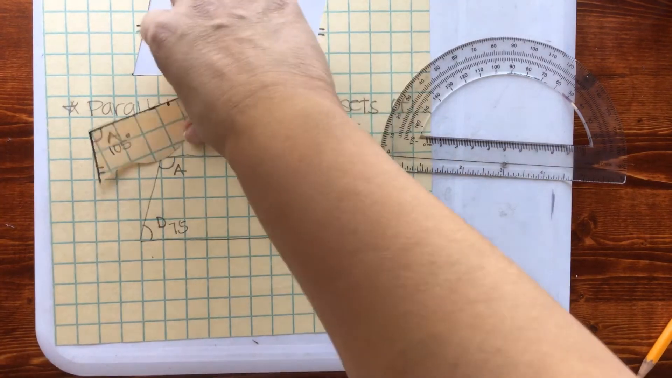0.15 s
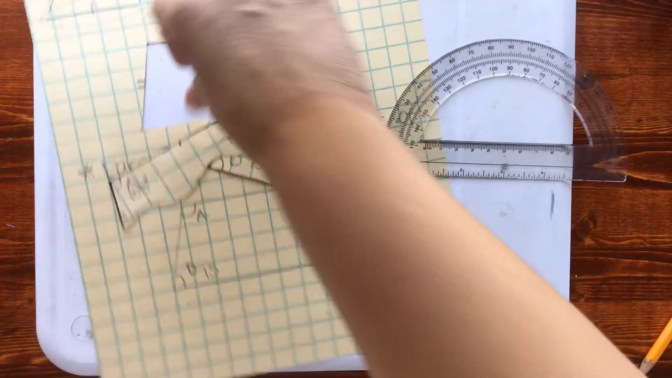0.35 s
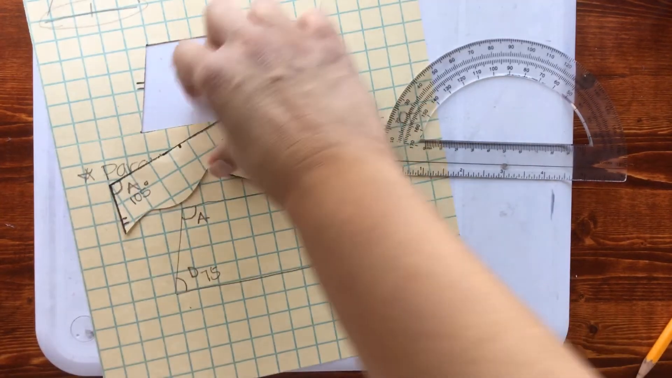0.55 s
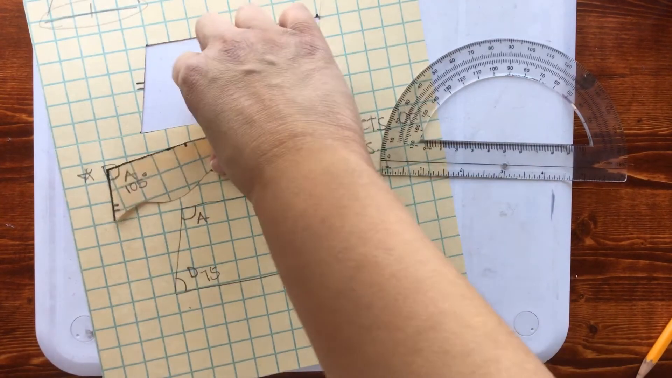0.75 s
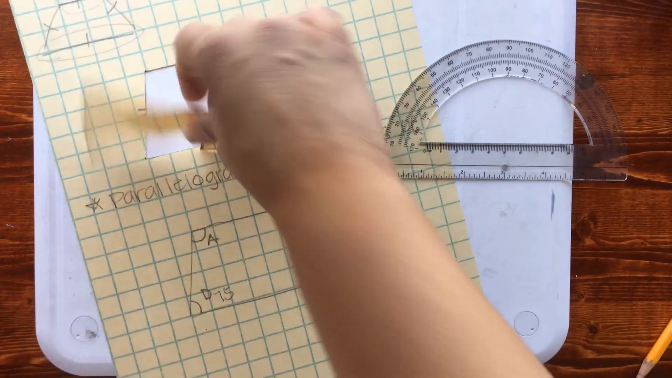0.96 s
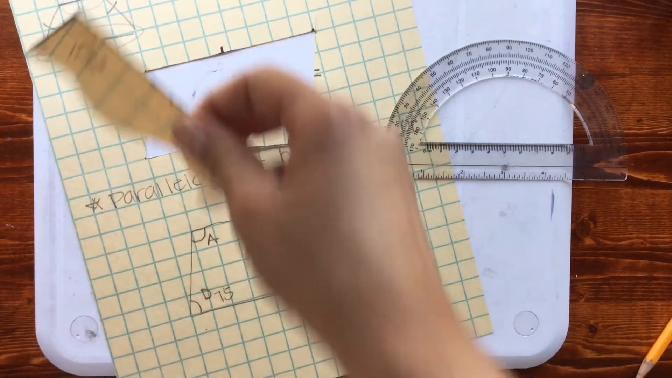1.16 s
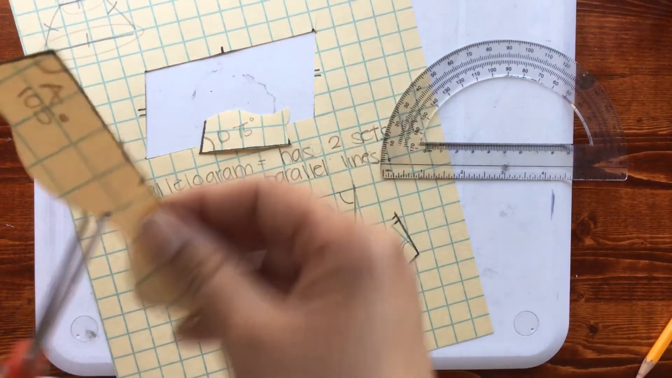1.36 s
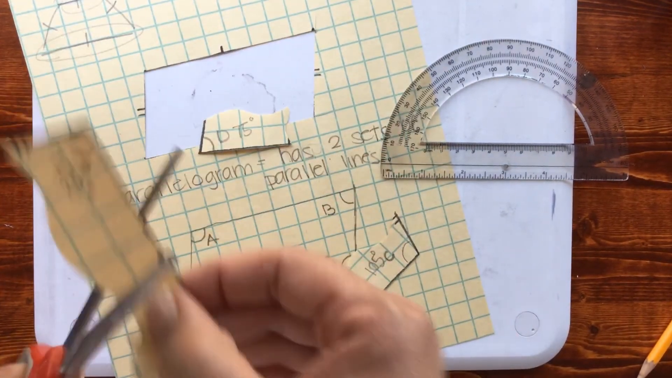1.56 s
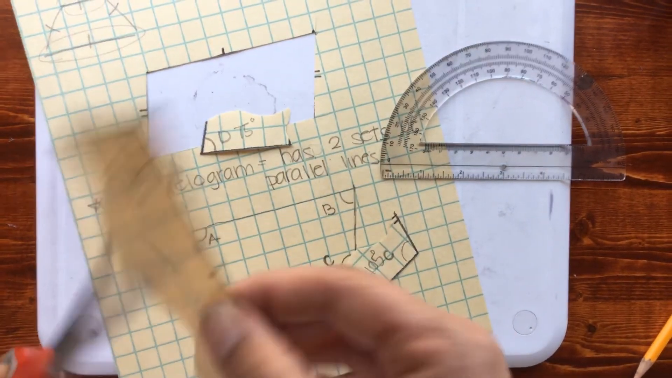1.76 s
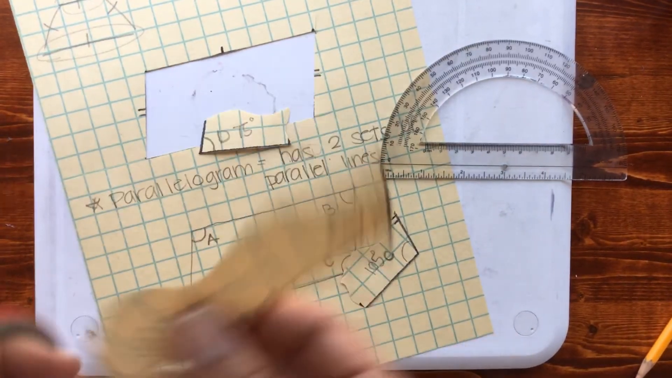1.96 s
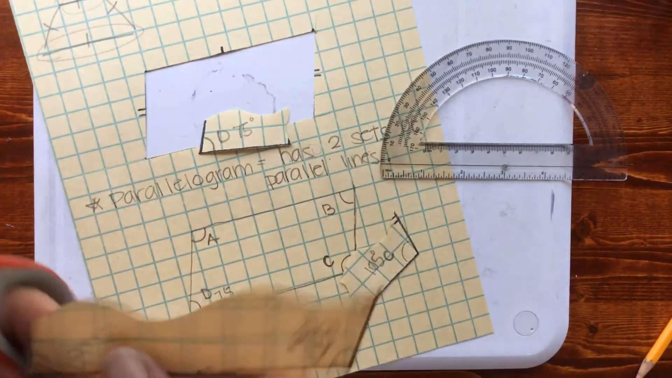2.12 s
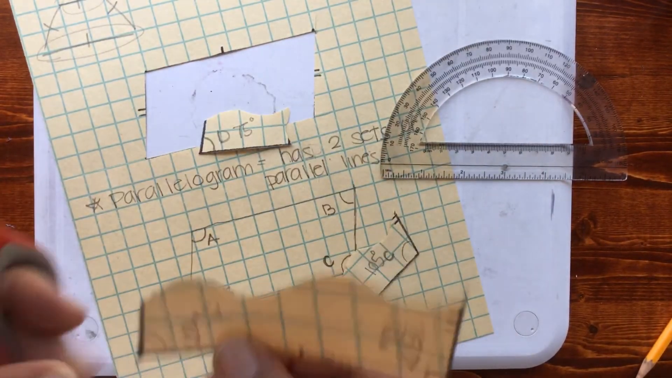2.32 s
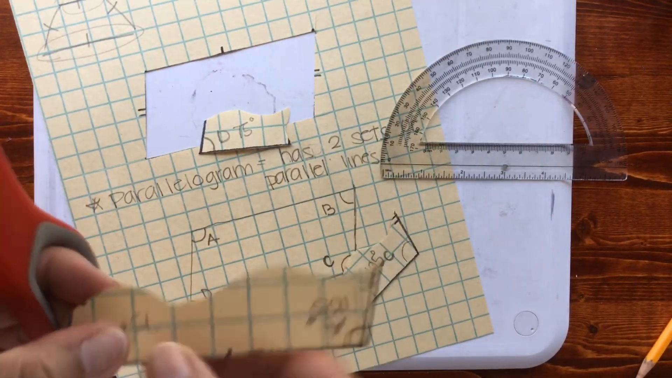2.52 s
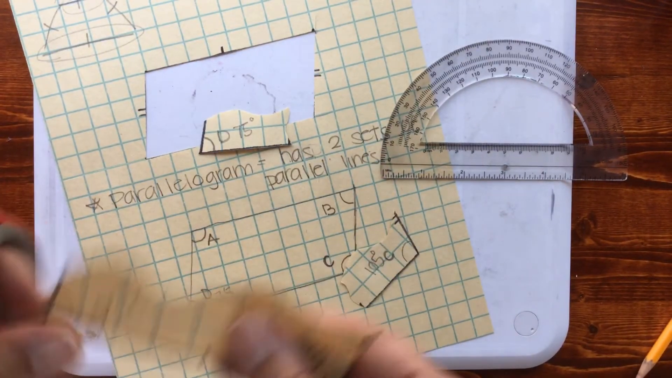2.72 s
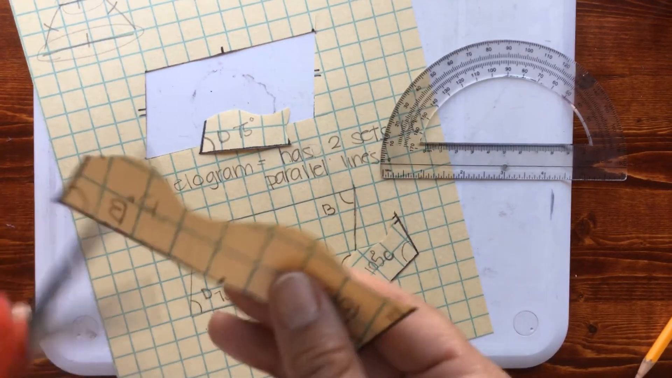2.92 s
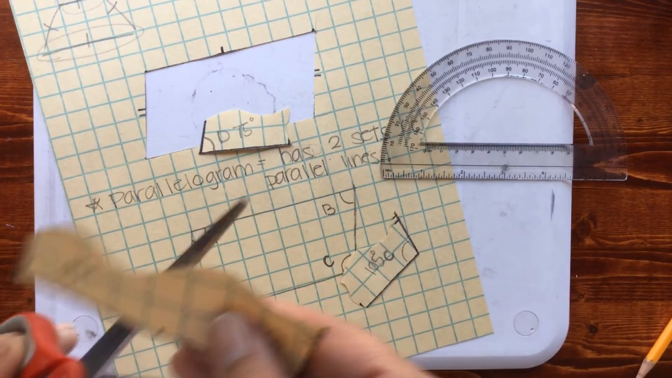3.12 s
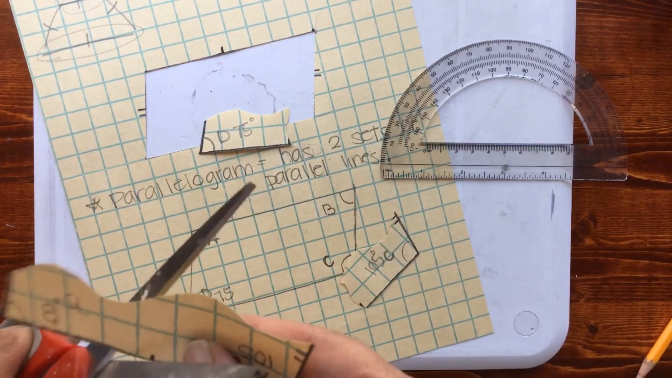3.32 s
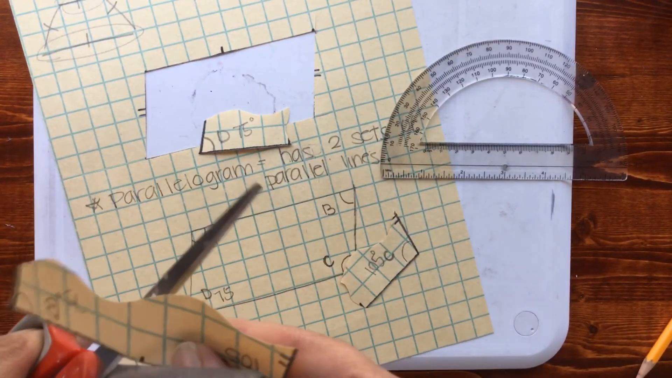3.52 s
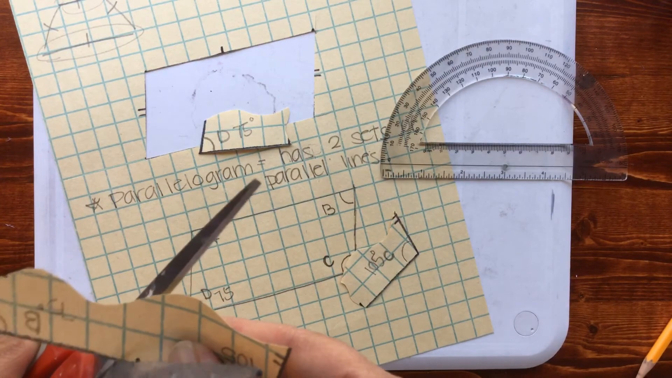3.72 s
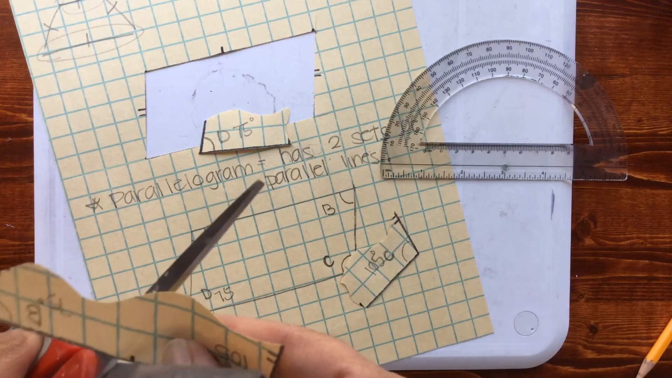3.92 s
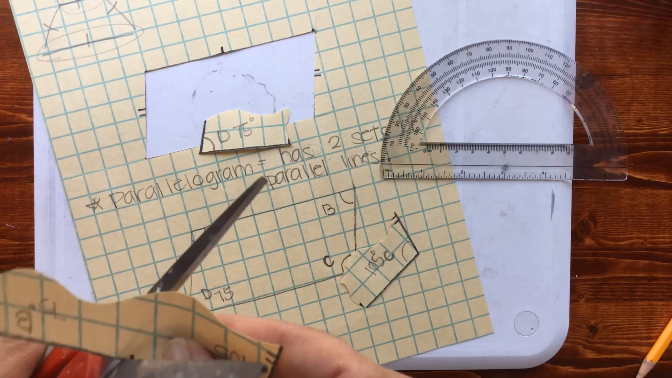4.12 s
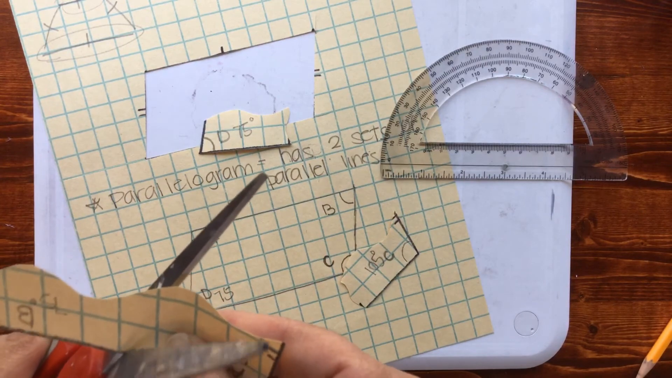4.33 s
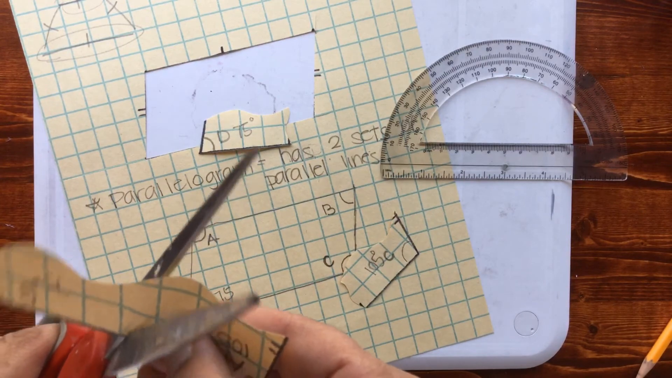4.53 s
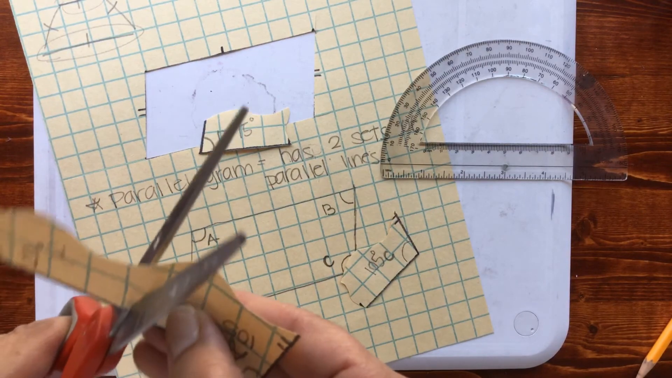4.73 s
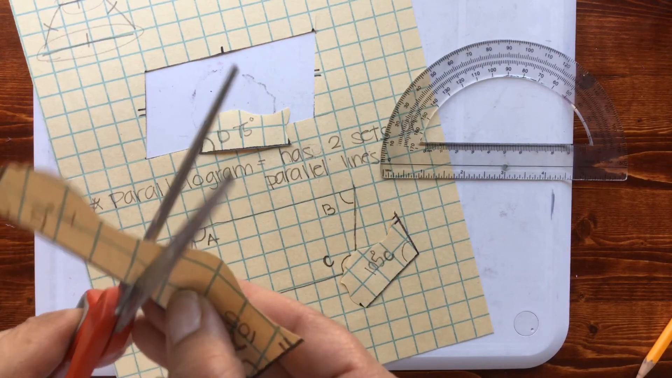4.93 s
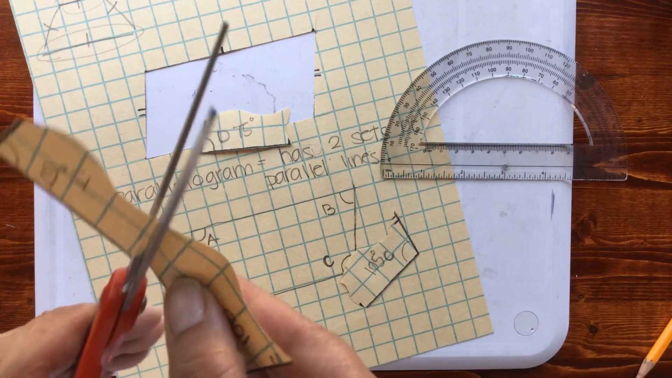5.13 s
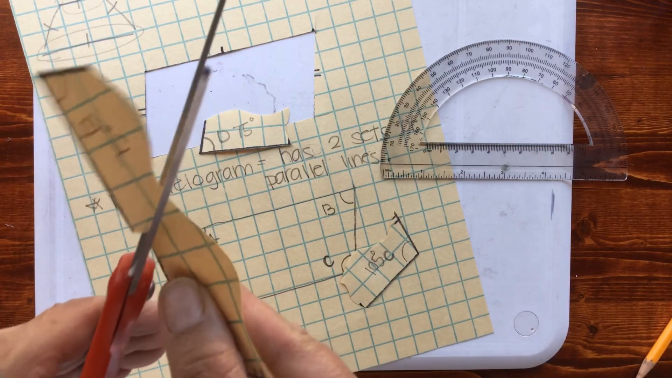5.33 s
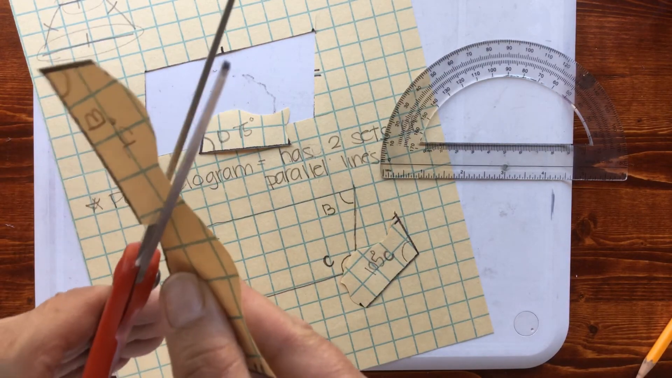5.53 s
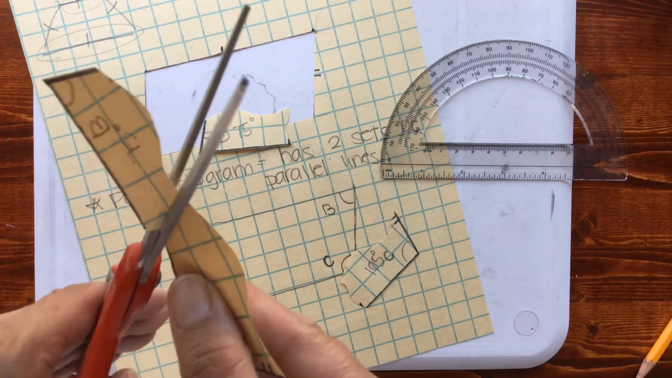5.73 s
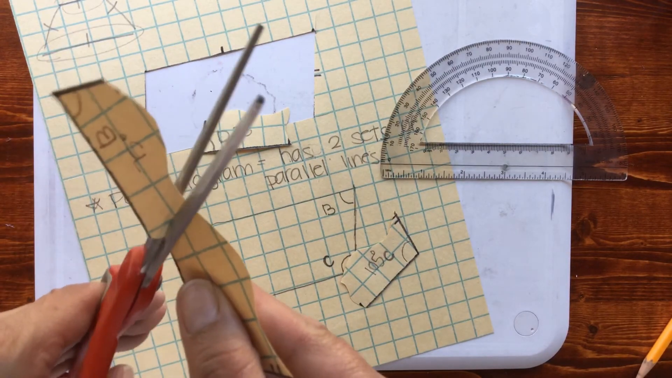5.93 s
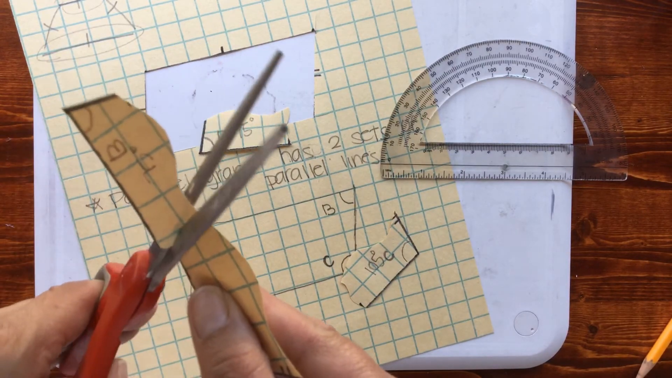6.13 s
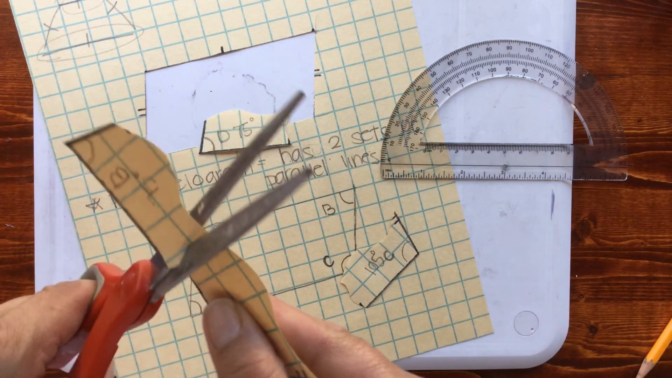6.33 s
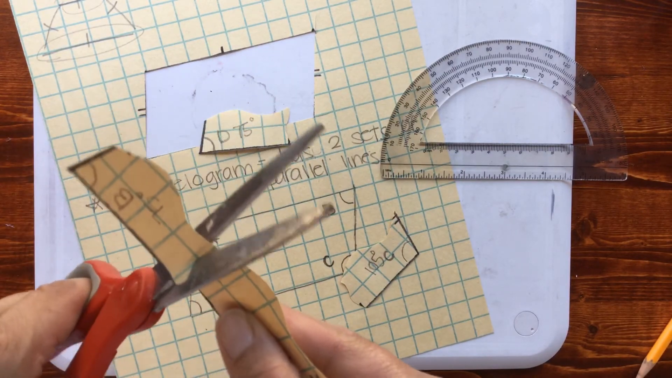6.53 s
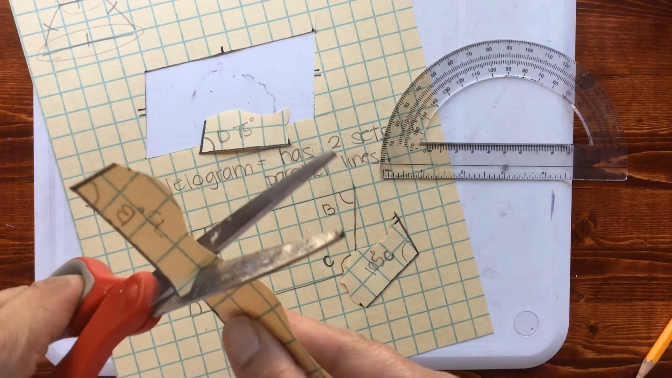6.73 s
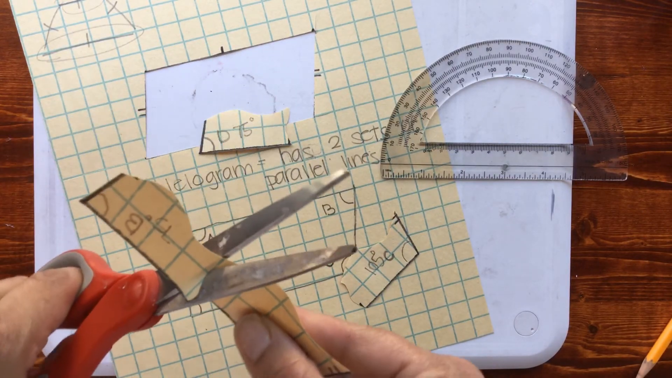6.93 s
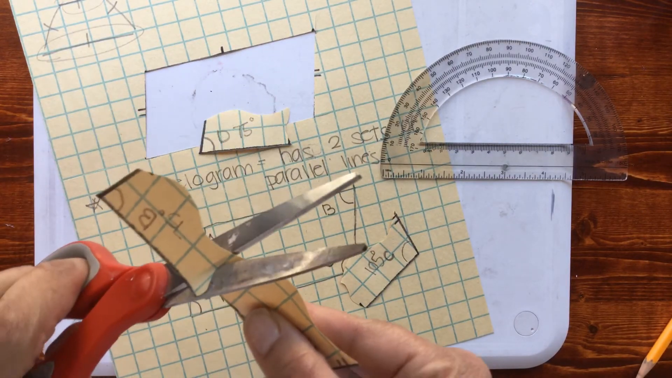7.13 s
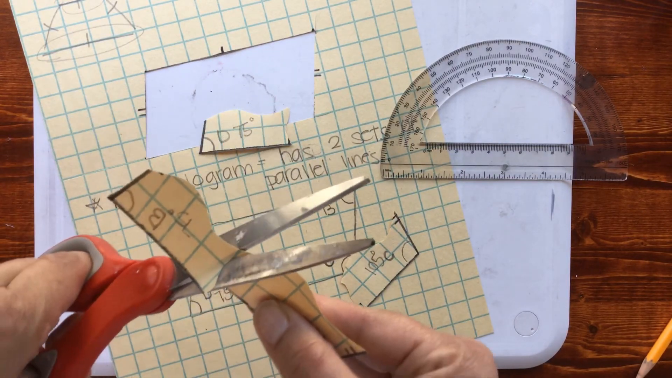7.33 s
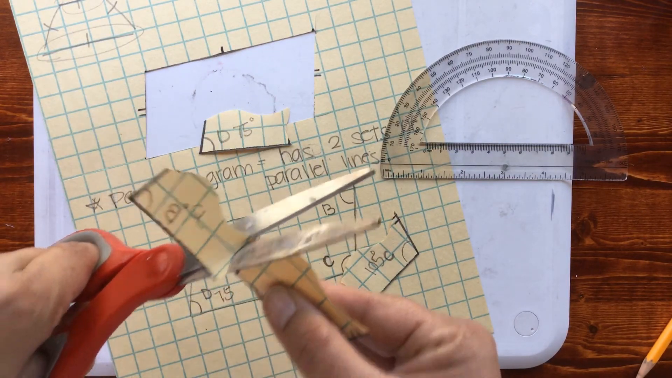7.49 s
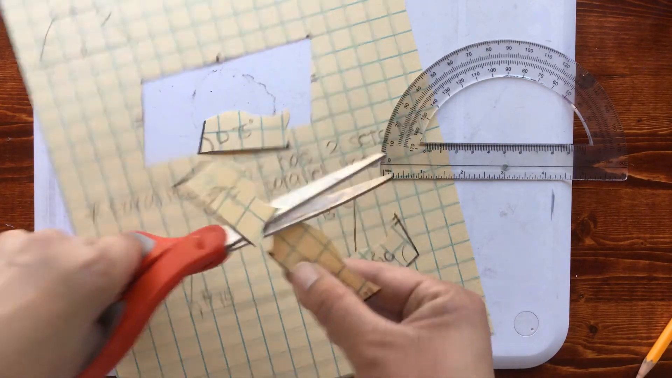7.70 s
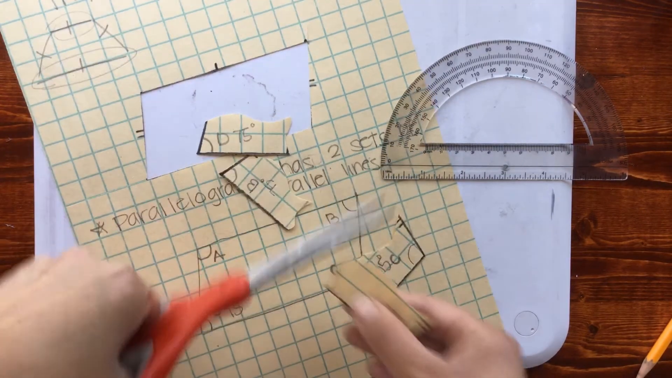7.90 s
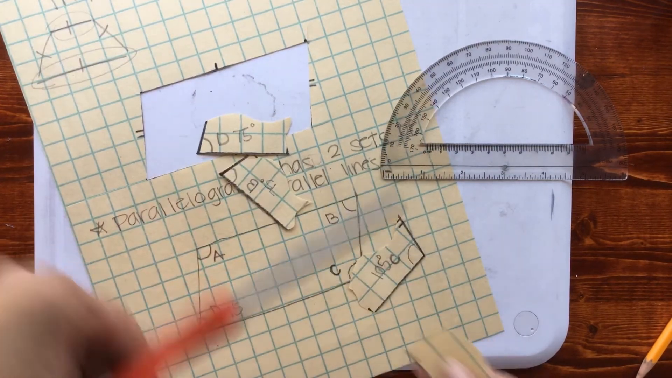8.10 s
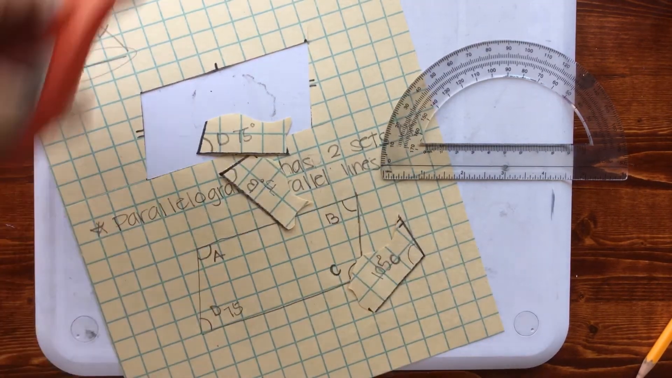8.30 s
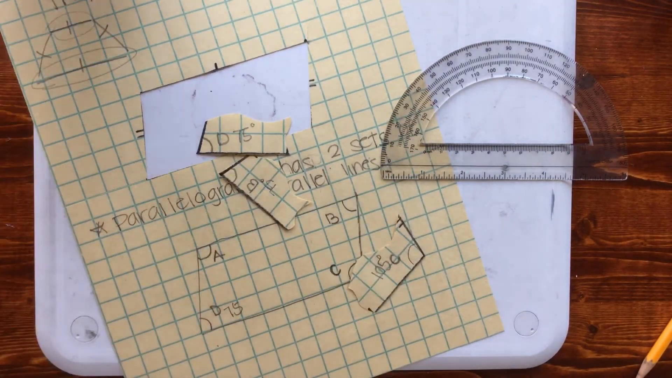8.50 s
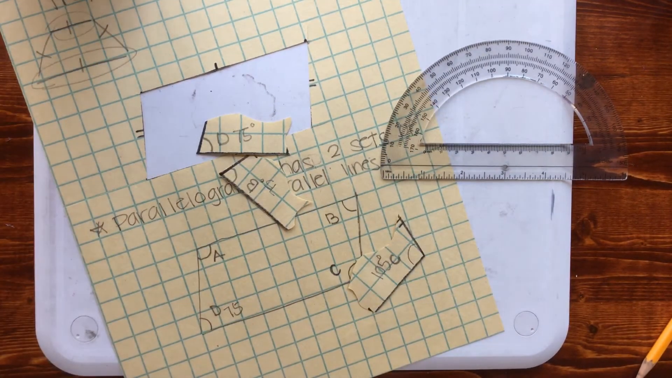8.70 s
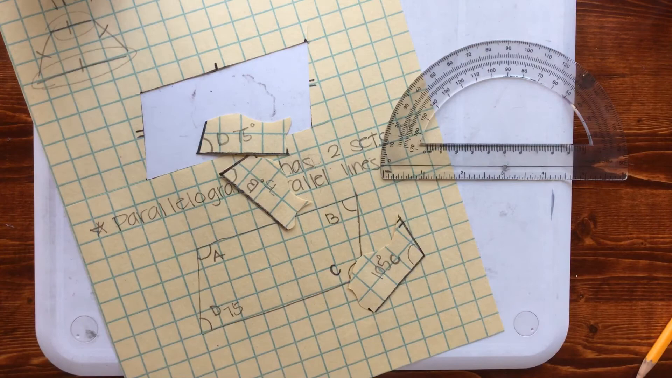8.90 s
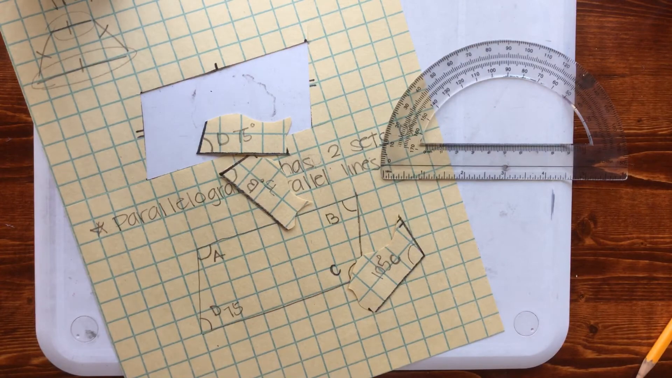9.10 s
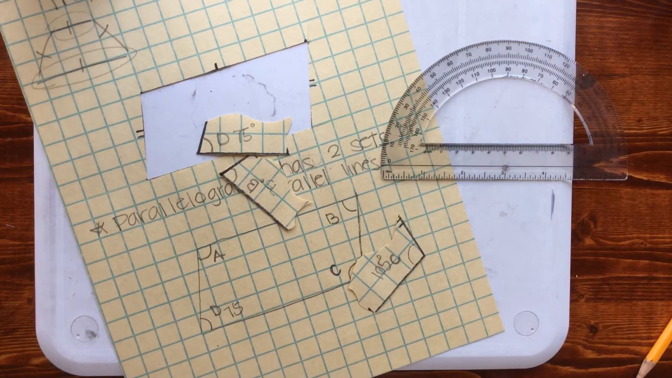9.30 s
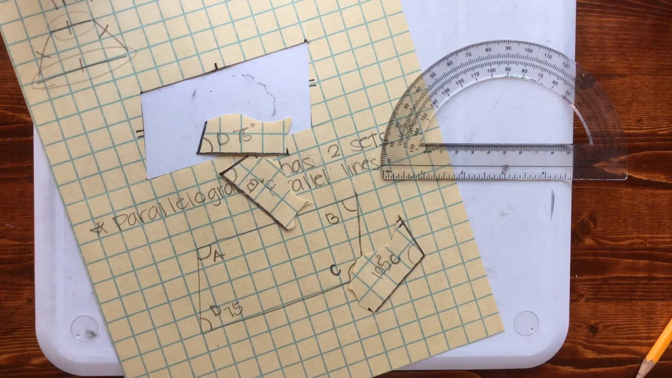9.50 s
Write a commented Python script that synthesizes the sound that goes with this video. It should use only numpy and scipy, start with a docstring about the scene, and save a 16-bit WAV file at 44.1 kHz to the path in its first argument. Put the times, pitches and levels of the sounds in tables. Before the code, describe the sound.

Dry paper rustles, brief drags and soft hollow knocks come first, with sudden crunches as a strip is flexed. A quieter pause leads to one slow scissor cut, densest at its start, then sparse ticking fibres until the blades snap shut. Loose metal ticks and a soft tap follow; after near silence, the scissors drop onto wood. Close, dry indoor sound with faint room air and low hum.

```python
"""Fingers are heard first, tapping and sliding over a sheet on a board; a paper strip rustles and crinkles.
Scissors then close slowly through the strip, a random train of parting fibres and louder snaps, and clack shut.
The pivot ticks, a few soft rubs and knocks follow, and the scissors clatter down on the wooden desk.
Friction is filtered random impulses; impacts are decaying noise and damped modes; a faint room answers."""
import sys
import numpy as np
from scipy import signal
from scipy.fft import rfft, irfft, next_fast_len
from scipy.io import wavfile
from scipy.ndimage import map_coordinates

SR = 44100
rng = np.random.default_rng(int(sys.argv[2]) if len(sys.argv) > 2 else 0)


def wrap_up_sound(samples):
    """Save the sound to the file named by the first command line argument, as 16-bit audio."""
    columns = np.atleast_2d(samples).T
    # keep every value between -1 and 1, then stretch to whole-number steps
    tamed = np.clip(columns, -1, 1)
    steps = np.round(tamed * 32767).astype(np.int16)
    wavfile.write(sys.argv[1], SR, steps)


N = 421155  # length of the scene [samples]
RING_SIZE = 16384  # length of one contact's answer [samples]
AGE = np.arange(RING_SIZE) / SR  # time since a contact [s]


# the closing blades: (time [s], relative fibre crackle level [dB], relative blade rasp level [dB])
CUT = [(4.3, -74, -83), (4.46, -75.5, -90), (4.53, -59.5, -67), (4.66, -67, -93), (4.83, -67.5, -85),
       (4.91, -53, -56), (4.99, -70, -90), (5.14, -56.5, -58.5), (5.23, -67, -67.5), (5.38, -58, -57),
       (5.53, -68, -67.5), (5.73, -60, -69.5), (6.03, -62, -68.5), (6.17, -69, -81), (6.43, -67, -84),
       (6.57, -83.5, -86), (6.85, -76, -82), (7.24, -70, -74), (7.35, -59.5, -69), (7.5, -67.5, -82.5),
       (7.745, -57, -63)]
# thick bundles of fibres snap: (time [s], relative snap level [dB], relative level of the strip's ring [dB])
SNAPS = [(4.5961, -38.5, -75), (4.7565, -41, -61), (4.7827, -38.5, -58), (4.857, -43.5, -70),
         (4.8715, -33.5, -64), (4.9053, -37, -60), (4.926, -35.5, -50), (4.9656, -36, -72),
         (5.012, -26.5, -48), (5.019, -29.5, -53), (5.1019, -33, -50), (5.143, -28, -61),
         (5.1608, -40.5, -59), (5.169, -30, -45), (5.1877, -38, -55), (5.2651, -35, -52), (5.275, -42, -63),
         (5.3637, -41, -57), (5.4847, -42, -55), (5.576, -35.5, -59), (5.609, -31.5, -68),
         (5.677, -44.5, -72), (5.694, -37, -66), (5.8629, -38, -61), (5.915, -36.5, -52),
         (6.0332, -40, -63), (6.106, -38, -64), (6.127, -39, -62), (6.2528, -44, -69), (6.3796, -42.5, -67),
         (6.4316, -47, -73), (6.4805, -47.5, -76), (6.697, -47, -63), (7.22, -49, -71), (7.3344, -43, -63),
         (7.3742, -40, -63), (7.43, -42.5, -60), (7.7023, -48, -59)]
# ticking of parted fibres: (frequency [Hz], level per Hz [dB])
FIBRE = [(600, -45), (1400, -22), (2700, -9), (3900, -21), (4900, -19), (5900, -10), (7600, -13),
         (8800, -1), (9700, 0), (10700, -8), (12000, -4), (15800, -8)]
# modes of the open blades, damped by the paper: (frequency [Hz], relative level [dB], t60 [s])
EDGES = [(2650, -2, 0.013), (3360, -4, 0.021), (4440, -9, 0.028), (5170, -4.5, 0.02), (6030, -2, 0.017),
         (6900, -3.5, 0.02)]
EDGES_DB = -14  # blade ring relative to the crackle [dB]
FIBRES_PER_S, CRACKLE_REF_DB = 250, -62  # impulse rate [1/s] at this crackle level [dB]
DENSITY_GROWS = 0.8  # growth of the rate with level [dB per dB]


def cutting():
    """Fracture noise: random fibre impulses and louder snaps excite the blades and the strip's resonance."""
    crackle_db, rasp_db = curves(CUT)
    bite = unit(amp(2.8 * wobble(45)))  # the blades advance in small jerks
    density = np.clip(amp(DENSITY_GROWS * (crackle_db - CRACKLE_REF_DB)), 0.2, 2)
    fibre_kicks = kicks(rate=FIBRES_PER_S * density, spread_db=2.5)
    fibres = bite * unit(fibre_kicks / np.sqrt(density))  # level kept independent of density
    treble = amp(crackle_db + 0.35) * fibres
    body = amp(rasp_db - 3) * fibres
    for s, snap_db, ring_db in SNAPS:
        add(treble, s, [amp(snap_db + 9.5)])
        add(body, s, [amp(ring_db + 15)])
    ticks = flexing(treble, FIBRE, hold_s=0.16, crack_t60=0.0045)
    shiver = flexing(body, [(300, -20), (1000, 0)], hold_s=0.13, crack_t60=0.009)
    edges = ring(EDGES, scatter_db=0)
    steel = signal.fftconvolve(treble, edges / np.linalg.norm(edges))[:N]
    return ticks + amp(EDGES_DB) * steel + reshape(shiver, strip_resonance)


# resonance of the strip as blades and fingers grip it anew: (time [s], frequency [Hz])
GRIP = [(4.3, 2780), (5.12, 2680), (5.2, 1440), (5.48, 1360), (5.65, 2320), (6.0, 2670), (6.4, 3270),
        (6.7, 2820), (7.0, 2750), (7.1, 1870), (7.45, 1860), (7.75, 2200)]


def strip_resonance(hz, s, upper=1.8, upper_db=-11):
    """Resonance of a gripped strip: a low mode and a weaker upper one, both moving with the grip."""
    centre = np.interp(s, *np.transpose(GRIP))

    def mode(f, width):
        return 1 / (1 + (np.log((hz + 1) / f) / width) ** 2)

    gain = mode(centre, 0.18) + amp(upper_db) * mode(upper * centre, 0.05)
    return gain / np.sqrt(np.mean(gain ** 2, axis=0))


# impact noise of the blades at their stop: (frequency [Hz], level per Hz [dB])
STEEL = [(150, -18), (350, -7), (1100, -22), (2000, -7), (3000, -17), (4700, -22), (5400, -4), (6200, -12),
         (6800, -6), (7800, -13), (9200, 3), (10500, -8), (12000, -6), (15500, -7)]
# modes of the shut blades: (frequency [Hz], level before random scatter [dB], t60 [s])
BLADES = [(2010, -35.5, 0.038), (4000, -53.5, 0.11), (5450, -30.5, 0.024), (6890, -31.5, 0.04),
          (9140, -15, 0.0054), (9200, -58, .25)]
# the loose pivot ticks as the scissors open: (time [s], relative energy level [dB])
TICKS = [(7.843, -31), (7.9321, -9), (8.0047, -23.5)]
# impact noise of the pivot: (frequency [Hz], level per Hz [dB])
PIVOT = [(1000, -29), (2200, -13.5), (4200, -35), (5400, -18), (7300, -19.5), (8400, -1.5), (9300, 4.5),
         (10400, -7.5), (13000, -24.5), (15500, -21)]


def clacks(shut_s=7.7606, shut_db=-3.5):
    """Impact and modal decay: the scissors hit their stop, damped by the hand; then the pivot ticks."""
    out = np.zeros(N)
    stop = burst(STEEL, crack_t60=0.005, tail_t60=0.026, tail_db=-15)
    add(out, shut_s, amp(shut_db) * stop + ring(BLADES, scatter_db=4))
    for s, tick_db in TICKS:
        tick = burst(PIVOT, crack_t60=0.002, tail_t60=0.041, tail_db=-18)
        add(out, s, amp(tick_db - 0.5) * tick)
    return out


# the strip buckles: (time [s], relative level [dB], relative level of body over treble [dB])
CRINKLES = [(0.391, -21, -7), (0.449, -31.5, -23), (1.0387, -35, -5.5), (1.0811, -31, -9.5),
            (2.0458, -36, -8), (2.1688, -45, -3), (2.185, -40.5, 1), (2.193, -32, -4), (2.276, -40, 4.5),
            (2.339, -40, -1), (2.357, -33.5, -8.5), (2.3963, -40, -12), (2.576, -44.5, -8),
            (2.5921, -50, 0), (2.6229, -35.5, -5), (2.653, -38, -13), (2.687, -40, -6), (2.7533, -25, -5.5),
            (2.761, -31, -7), (2.821, -41.5, -11), (2.8781, -36.5, -4), (4.392, -45, -5.5),
            (6.656, -48, -11)]
# creasing paper: (frequency [Hz], level per Hz [dB])
CREASE = [(180, -35), (300, -3.5), (440, -4.5), (667, -4.5), (978, -20), (1320, 2), (2210, -4.5), (2520, 7),
          (4590, -22), (6200, -7), (7690, -15.5), (9240, 3.5), (10600, -17), (12100, -8.5), (16000, -16)]
CRINKLE_T60_S = 0.043  # decay time of a crunch [s]


def crinkles():
    """Buckling: each sudden crunch of the strip is a decaying cluster of tiny creases."""
    out = np.zeros(N)
    for s, crinkle_db, body_db in CRINKLES:
        creases = grains(rate=2500, spread_db=4, tail_t60=0.012, tail_db=-14, size=RING_SIZE)
        envelope = decay(CRINKLE_T60_S) + 0.65 * decay(0.004)
        crunch = colour(creases * envelope, CREASE)
        add(out, s + 0.001, amp(crinkle_db + 12) * balance(crunch, body_db + 5))
    return out


# the fingers slide and flex the paper:
# (start [s], length [s], relative hiss level [dB], relative level of the sheet's body over the hiss [dB])
STROKES = [(0.142, 0.082, -62, 2), (0.215, 0.033, -49.5, -25), (0.307, 0.043, -60.5, -4),
           (0.373, 0.089, -44.5, -24), (0.45, 0.065, -61, -26), (0.795, 0.11, -53.5, -14),
           (0.982, 0.037, -41.5, -12), (0.993, 0.092, -43.5, -4.5), (1.156, 0.098, -60, -15),
           (1.292, 0.23, -58, -12), (1.359, 0.073, -48.5, -13.5), (1.667, 0.075, -55.5, -7),
           (1.869, 0.073, -52.5, -8.5), (1.99, 0.082, -55.5, 2), (2.062, 0.11, -59.5, -5),
           (2.211, 0.068, -47.5, -7.5), (2.291, 0.031, -60.5, 8.5), (2.331, 0.038, -49, 2),
           (2.385, 0.1, -70, 4), (2.698, 0.058, -52, 1), (2.736, 0.03, -38.5, -1.5),
           (2.837, 0.13, -55, -4.5), (2.942, 0.12, -69, -2), (3.101, 0.057, -64.5, -4),
           (3.297, 0.17, -69.5, -2.5), (3.697, 0.06, -72, -5), (4.06, 0.07, -75, -3),
           (4.114, 0.023, -62.5, 3), (7.79, 0.14, -66, -12), (7.835, 0.025, -49, -11),
           (8.348, 0.092, -69, -1.5), (8.46, 0.22, -66.5, -3), (8.712, 0.1, -74, 8), (9.383, 0.04, -73, 3)]
# faint rubbing while the hands hold the paper: (time [s], relative level [dB])
HANDLING = [(0, -79), (1.5, -69), (1.82, -79), (3.1, -78), (3.6, -100), (4.3, -84), (7.8, -77.5),
            (8.8, -80), (9.15, -86.5), (9.55, -76.5)]
# sliding paper: (frequency [Hz], level per Hz [dB])
SLIDING = [(590, -53.5), (1000, -11.5), (1260, -9), (1750, -5.5), (1870, -13.5), (2050, -5), (2280, -6.5),
           (2910, -4), (3710, -21.5), (4900, -16), (7350, -12.5), (9600, 3), (10700, -16.5), (11800, -3),
           (16000, -19)]


def rustle():
    """Dry friction: dense catches of paper on paper and skin make hiss, and the flexing sheet adds body."""
    catches = kicks(rate=4000, spread_db=4.5)
    rub = flexing(catches, SLIDING, hold_s=0.035, crack_t60=0.006)
    body, hiss = split(rub * amp(2.1 * wobble(70)))
    now = np.arange(N) / SR
    moving = (now < CUT[0][0]) | (now > CUT[-1][0])  # the strip is held still while it is being cut
    held = moving * amp(curves(HANDLING)[0])
    hiss_strokes = strokes([(s, length, db) for s, length, db, _ in STROKES])
    body_strokes = strokes([(s, length, db + body_db) for s, length, db, body_db in STROKES])
    hiss_gain = np.hypot(held, hiss_strokes)
    body_gain = np.hypot(held * amp(1.5), body_strokes)
    return amp(0.4) * hiss_gain * unit(hiss) + amp(-5) * body_gain * unit(body)


# the sheet drags over the board: (start [s], length [s], level [dB])
DRAGS = [(0.72, 0.048, -48), (0.775, 0.047, -52.5), (0.85, 0.082, -68.5), (0.965, 0.048, -54)]


def drag():
    """Stick-slip friction: the sheet catches and slips on the hollow board, which colours each slip."""
    slips = grains(rate=450, spread_db=7, tail_t60=0.047, tail_db=-8.5)
    # (frequency [Hz], level per Hz [dB])
    board = [(120, -20), (300, -9.5), (700, 7), (1100, -9), (2400, -9), (3300, -21), (5000, -36)]
    return strokes(DRAGS) * unit(colour(slips, board))


# soft knocks on the board under the sheet: (time [s], relative knock level [dB], relative thud over knock [dB])
TAPS = [(0.165, -26, -22), (0.34, -43, -31), (0.358, -38.5, -19.5), (0.393, -31, -29), (0.452, -42.5, -35),
        (0.726, -33, -24), (2.19, -49, -10.5), (2.275, -46.5, -10), (2.345, -46, -13), (2.621, -51.5, -12),
        (2.752, -43, -15.5), (7.844, -28, -23.5), (8.743, -43.5, -15)]
# hollow knock of the board: (frequency [Hz], level per Hz [dB])
BOARD = [(120, -23), (300, -6.5), (600, 7.5), (800, 4.5), (1100, -9.5), (2400, -9), (3200, -20),
         (4500, -45), (9000, -62)]
# low thud, also used by the landing: (frequency [Hz], level per Hz [dB])
THUD = [(40, -24), (65, -5.5), (175, -1), (280, 1.5), (350, -9.5), (600, -18.5), (1200, -54.5)]


def taps():
    """Impact response: a soft contact gives a hollow knock, and the board thuds just after."""
    out = np.zeros(N)
    for s, knock_db, thud_db in TAPS:
        knock = burst(BOARD, crack_t60=0.033, tail_t60=0.22, tail_db=-13)
        add(out, s + 0.0018, amp(knock_db + 13.5) * knock)
        thud = burst(THUD, crack_t60=0.17, tail_t60=0.15, tail_db=-4)
        add(out, s + 0.006, amp(knock_db + thud_db + 33.5) * thud)
    return out


# the scissors land and bounce: (time [s], relative clatter level [dB], relative thump level [dB])
LANDING = [(9.2315, 0.5, -23), (9.2657, -7, -29), (9.281, -20, -49.5)]
# blades and handles on wood: (frequency [Hz], level per Hz [dB])
CLATTER = [(200, -25.5), (500, -9.5), (850, 2), (1200, -2), (1550, 6.5), (2200, -0.5), (3700, -14),
           (4600, -14), (5800, -6), (7300, -21.5), (9000, 6.5), (11000, -3.5), (15500, -20)]
# modes of the desk top: (frequency [Hz], relative level [dB], t60 [s])
DESK = [(178, -4, 0.1), (692, -20, 0.16), (839, -17, 0.1), (1034, -32, 0.42), (1476, -23.5, 0.27),
        (1690, -36, 0.13), (2120, -28, 0.19), (2175, -21, 0.076), (2670, -29.5, 0.25), (2680, -44, 0.2)]


def landing():
    """Impact excitation: blades and handles clatter on wood, and the desk top booms in its modes."""
    out = np.zeros(N)
    for s, clatter_db, thump_db in LANDING:
        wood, steel = split(burst(CLATTER, crack_t60=0.009, tail_t60=0.07, tail_db=-12))
        add(out, s, amp(clatter_db - 1.5) * (wood + steel * decay(0.118)))  # the steel is damped first
        boom = ring(DESK, scatter_db=-0.5) * (1 - decay(0.017))  # the modes build up gradually
        add(out, s + 0.00348, amp(thump_db + 1.5) * boom)
        thud = burst(THUD, crack_t60=0.053, tail_t60=0.18, tail_db=-21)
        add(out, s + 0.0067, amp(thump_db + 9) * thud)
    return out


# colour of the walls: (frequency [Hz], relative reflected level [dB])
WALLS = [(150, 1.5), (1500, -1.5), (4000, -4), (9000, -4.5), (16000, -1.5)]
# reverberation: (frequency [Hz], t60 [s])
ROOM = [(150, 0.41), (1500, 0.36), (9000, 0.25), (16000, 0.3)]


def room(x):
    """Reverberation: the walls colour the sound and answer with noise whose decay depends on frequency."""
    hz, t, z = signal.stft(rng.standard_normal(SR // 2), SR, nperseg=256)
    fading = np.exp(-np.log(1000) * t / along(ROOM, hz)[:, None])
    tail = signal.istft(z * fading, SR, nperseg=256)[1]
    tail = np.concatenate([np.zeros(round(0.005 * SR)), tail])  # 5 ms before the first reflection
    return signal.fftconvolve(colour(x, WALLS), tail / np.linalg.norm(tail))[:N]


# quiet room air: (frequency [Hz], level per Hz [dB])
AIR = [(15, -57.5), (25, -17), (89, -7), (166, -7.5), (212, -17), (249, -9), (301, -15.5), (363, -13.5),
       (463, -27), (641, -19.5), (754, -27), (2160, -28.5), (3340, -42.5), (9320, -43.5), (16000, -47)]
AIR_DB = -66.02  # rms level [dB]


def background():
    """Stationary noise and frequency modulation: quiet room air with a low, wavering hum."""
    air = amp(AIR_DB) * unit(colour(rng.standard_normal(N), AIR, size=16384))
    hum_hz = 88 + 2.64 * wobble(12)
    hum = np.sin(2 * np.pi * np.cumsum(hum_hz) / SR) * amp(3 * wobble(7))
    return air + amp(-70.5) * hum


def flexing(catches, spectrum, hold_s, crack_t60):
    """Time-varying resonance: catches ring a bending sheet whose answer changes every hold_s seconds."""
    out, hop = np.zeros(N), round(hold_s * SR)
    for start in range(0, N, hop):
        answer = burst(spectrum, crack_t60, tail_t60=0.02, tail_db=-14, size=1024)
        add(out, start / SR, signal.fftconvolve(catches[start:start + hop], answer))
    return out


def kicks(rate, spread_db, size=N):
    """Random impulse train: tiny catches at random times, of uneven size and sign, rms 1."""
    sizes = amp(spread_db * np.clip(rng.standard_normal(size), -2, 2)) * rng.choice([-1, 1], size)
    return unit(sizes * (rng.random(size) < rate / SR))


def grains(rate, spread_db, tail_t60, tail_db, size=N):
    """Convolution of impulse and response: each random catch shakes the paper briefly, rms 1."""
    shiver = amp(tail_db) * decay(tail_t60) * rng.standard_normal(RING_SIZE)
    shiver[0] = 1
    return unit(signal.fftconvolve(kicks(rate, spread_db, size), shiver)[:size])


ATTACK_S, RELEASE_S = 0.021, 0.0067  # rise time and release time constant of a stroke [s]
ARCH_DB = 3.5  # a stroke is fastest in its middle; drop towards its ends [dB]


def strokes(rows):
    """Power addition of overlapping strokes (start [s], length [s], level [dB]), returned as a gain."""
    power, age = np.zeros(N), np.arange(SR // 2) / SR
    for s, length, db in rows:
        arch = amp(db - ARCH_DB * (2 * np.minimum(age / length, 1) - 1) ** 2)
        attack = np.minimum(age / ATTACK_S, 1)
        release = np.exp(-np.maximum(age - length, 0) / RELEASE_S)
        add(power, s, (arch * attack * release) ** 2)
    return np.sqrt(power)


def decay(t60, size=RING_SIZE):
    """Exponential damping: an envelope that loses 60 dB in t60 seconds."""
    return np.exp(-np.log(1000) * AGE[:size] / t60)


def burst(spectrum, crack_t60, tail_t60, tail_db, size=RING_SIZE):
    """Two-stage decay of coloured noise, energy 1: a sharp crack, then a diffuse shiver."""
    envelope = decay(crack_t60, size) + amp(tail_db) * decay(tail_t60, size)
    x = colour(rng.standard_normal(size) * envelope, spectrum, size=min(size, 4096))
    return x / np.linalg.norm(x)


def ring(modes, scatter_db):
    """Modal superposition: damped modes of random strength; loose contact blurs their pitch."""
    out = np.zeros(RING_SIZE)
    for hz, db, t60 in modes:
        strength = amp(db + scatter_db * rng.standard_normal())
        blur = np.cumsum(rng.standard_normal(RING_SIZE)) * 0.0012 * np.sqrt(hz)  # phase drift [rad]
        out += strength * decay(t60) * np.sin(2 * np.pi * hz * AGE + blur)
    return out


def colour(x, spectrum, size=4096):
    """Minimum-phase filtering: the cepstrum is folded to make a causal filter with this spectrum."""
    cepstrum = irfft(np.log(amp(along(spectrum, np.fft.rfftfreq(size, 1 / SR))) + 1e-6))
    cepstrum[1:size // 2] *= 2
    cepstrum[size // 2 + 1:] = 0
    return signal.fftconvolve(x, irfft(np.exp(rfft(cepstrum))))[:len(x)]


def reshape(x, gain):
    """Short-time spectral filtering: a moving colour, gain(frequency [Hz], time [s])."""
    hz, s, z = signal.stft(x, SR, nperseg=256)
    return signal.istft(z * gain(hz[:, None], s[None]), SR, nperseg=256)[1][:N]


def split(x, edge_hz=4300):
    """Band splitting: the body and the treble of a sound."""
    filters = [signal.butter(4, edge_hz, kind, fs=SR, output="sos") for kind in ("low", "high")]
    return [signal.sosfilt(sos, x) for sos in filters]


def balance(x, body_db):
    """Energy balance: treble of energy 1 and a body body_db above it."""
    body, treble = split(x)
    return treble / np.linalg.norm(treble) + amp(body_db) * body / np.linalg.norm(body)


def amp(db):
    """Logarithmic level: decibels to gain."""
    return 10 ** (np.asarray(db) / 20)


def unit(x):
    """Root-mean-square normalisation to 1."""
    return x / np.sqrt(np.mean(x ** 2) + 1e-20)


def along(points, hz):
    """Logarithmic frequency axis: (frequency [Hz], value) points interpolated at hz."""
    f, v = np.transpose(points)
    return np.interp(np.log(hz + 1), np.log(f), v)


def curves(rows):
    """Linear interpolation in time of each column; -120 outside the rows."""
    s, *cols = np.transpose(rows)
    return [np.interp(np.arange(N) / SR, s, c, left=-120, right=-120) for c in cols]


def wobble(rate):
    """Band-limited fluctuation: a smooth random curve with rate knots a second."""
    return map_coordinates(rng.standard_normal(int(N * rate / SR) + 4), [np.arange(N) * rate / SR])


def add(track, s, sound):
    """Linear superposition: mix a sound into the track at s seconds."""
    part = track[max(0, round(s * SR)):][:len(sound)]
    part += sound[:len(part)]


def scene():
    """Direct-to-reverberant ratio: every contact is close to the microphone, so the room stays faint."""
    near = cutting() + clacks() + crinkles() + rustle() + drag() + taps() + landing()
    return (near + amp(-13.5) * room(near) + background())[None]


TOP_HZ = 16300  # upper band limit [Hz]


def record(dry):
    """Band limiting: the deepest bass is rolled off and nothing is kept from the upper limit on."""
    size = next_fast_len(N + SR // 2)
    hz = np.fft.rfftfreq(size, 1 / SR)
    low_cut = hz ** 4 / (hz ** 4 + 34 ** 4)
    return irfft(rfft(dry, size) * low_cut * (hz < TOP_HZ), size)[..., :N]


dry = scene()
out = record(dry)
wrap_up_sound(out)
```